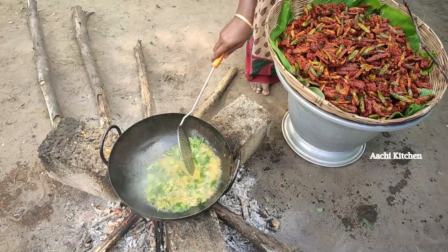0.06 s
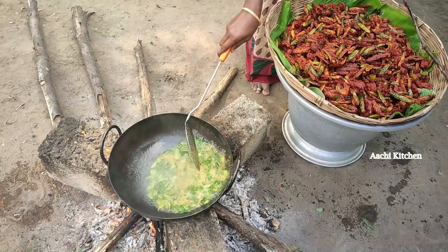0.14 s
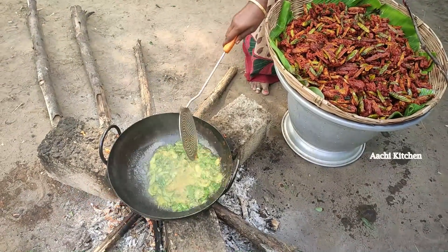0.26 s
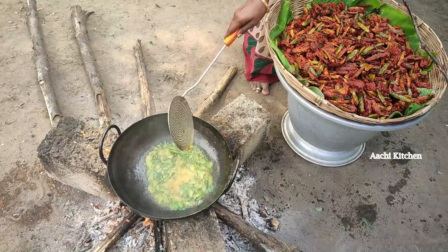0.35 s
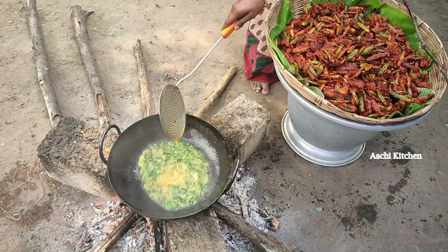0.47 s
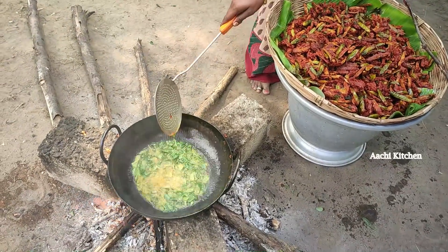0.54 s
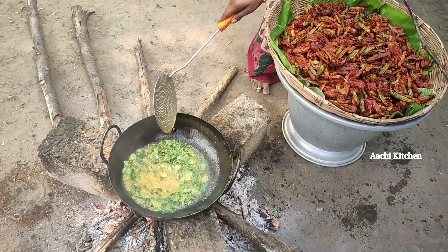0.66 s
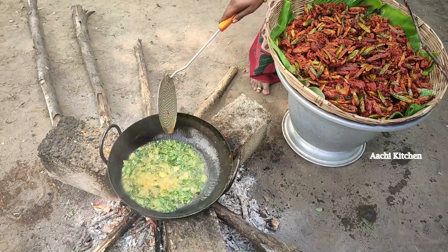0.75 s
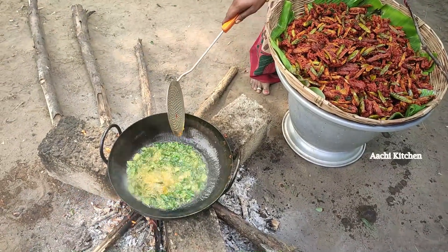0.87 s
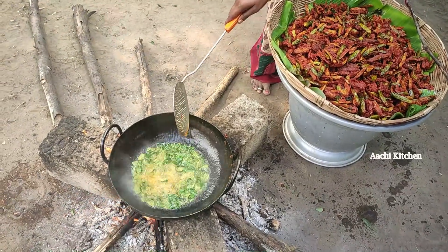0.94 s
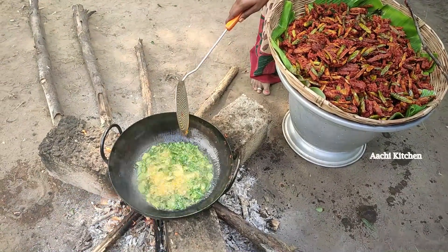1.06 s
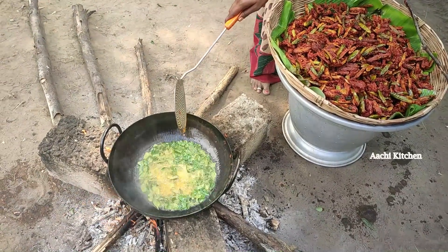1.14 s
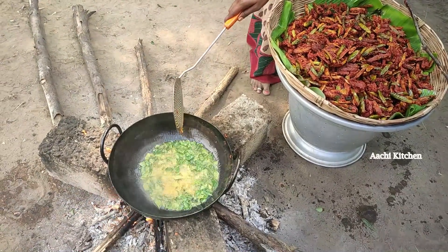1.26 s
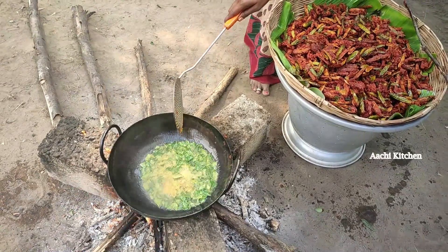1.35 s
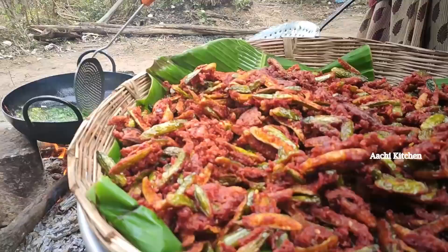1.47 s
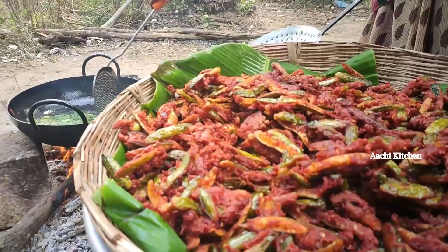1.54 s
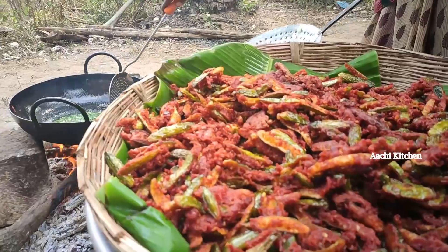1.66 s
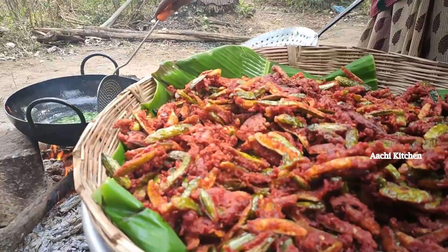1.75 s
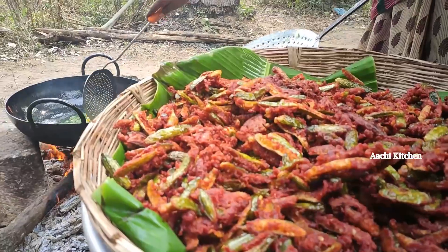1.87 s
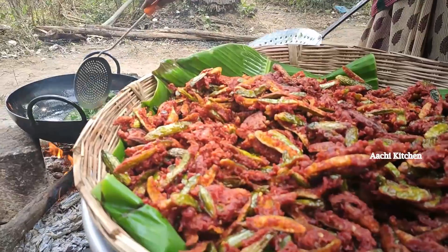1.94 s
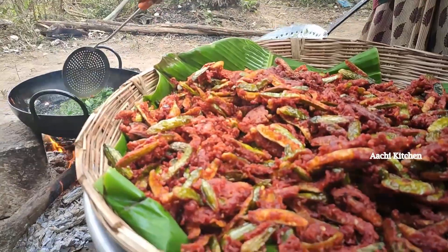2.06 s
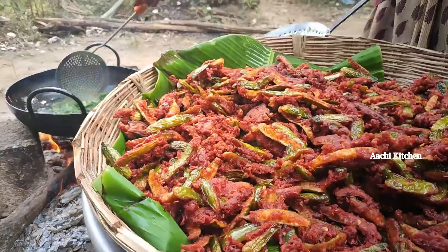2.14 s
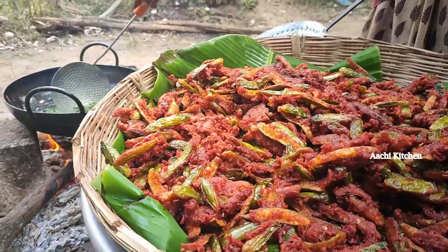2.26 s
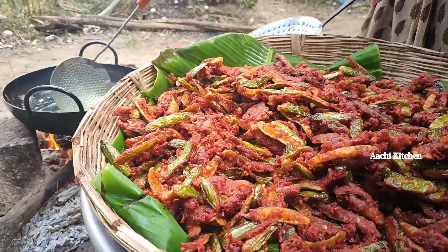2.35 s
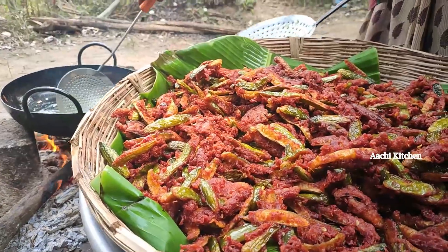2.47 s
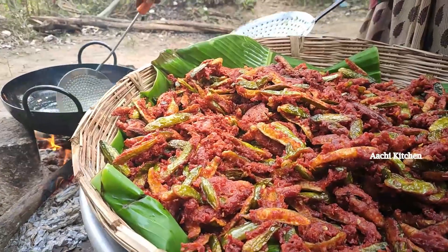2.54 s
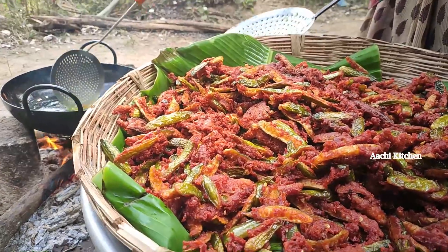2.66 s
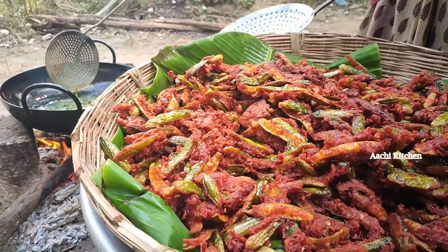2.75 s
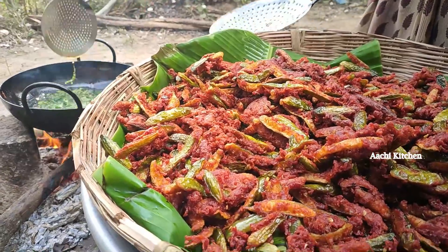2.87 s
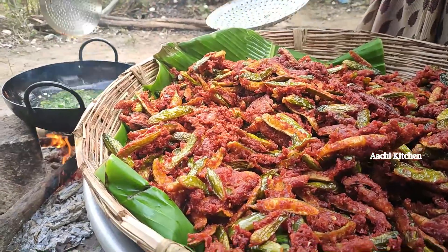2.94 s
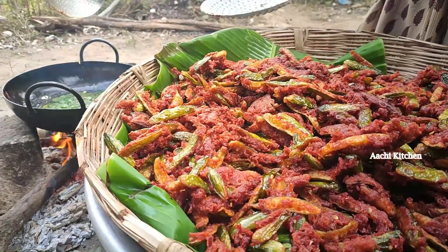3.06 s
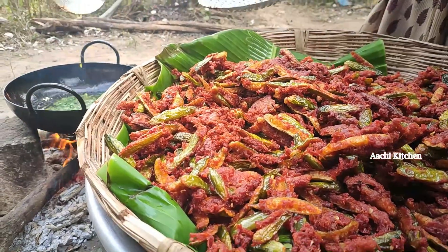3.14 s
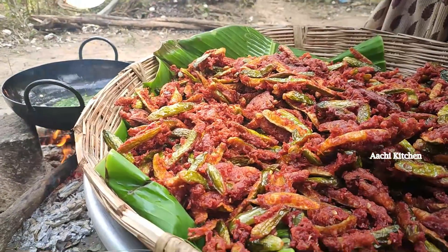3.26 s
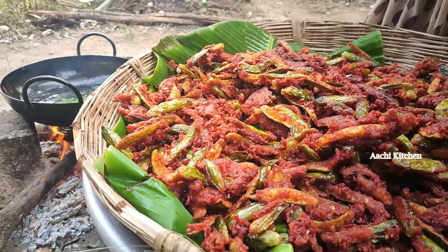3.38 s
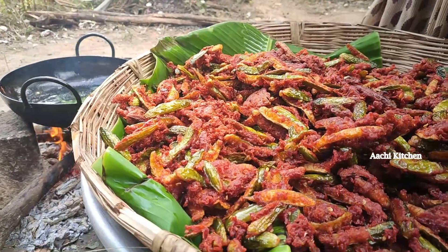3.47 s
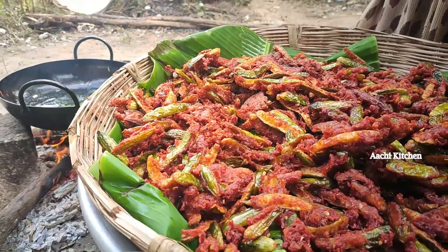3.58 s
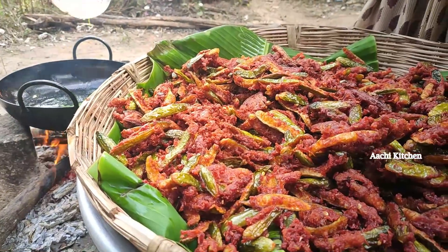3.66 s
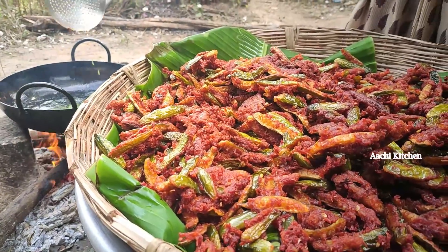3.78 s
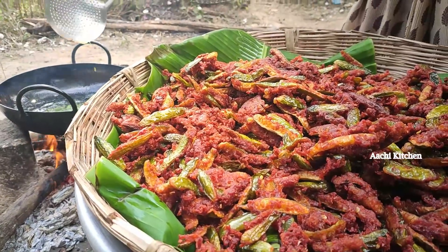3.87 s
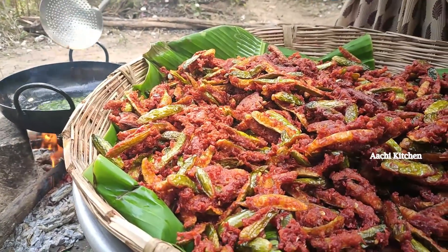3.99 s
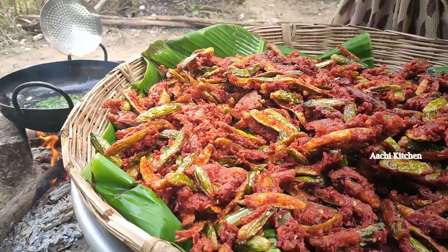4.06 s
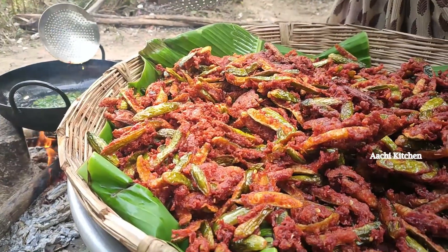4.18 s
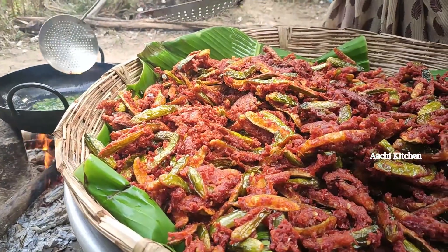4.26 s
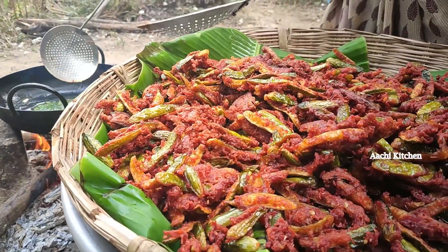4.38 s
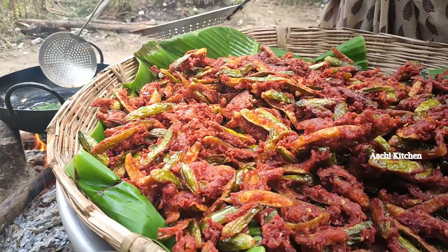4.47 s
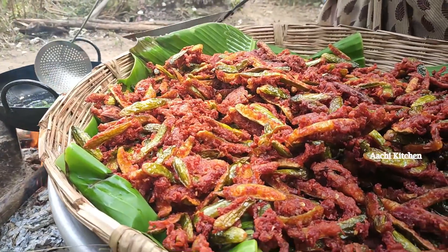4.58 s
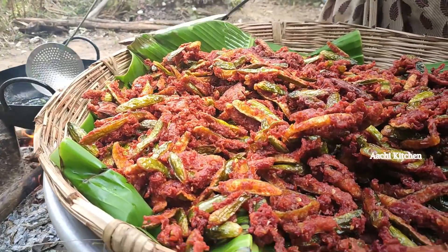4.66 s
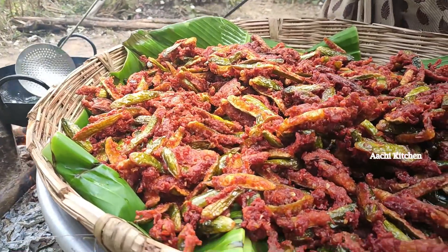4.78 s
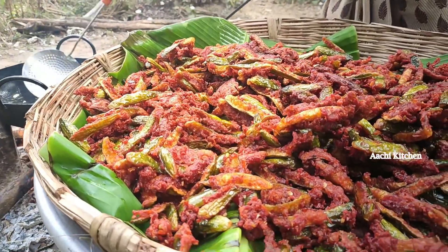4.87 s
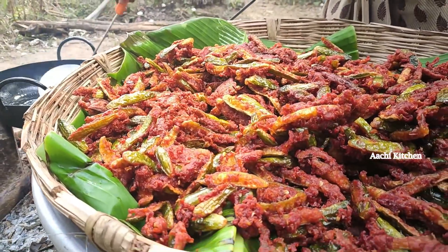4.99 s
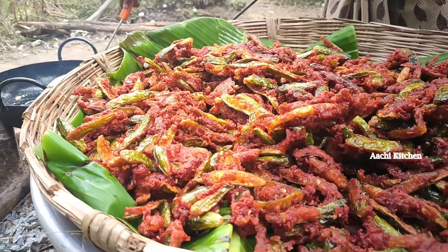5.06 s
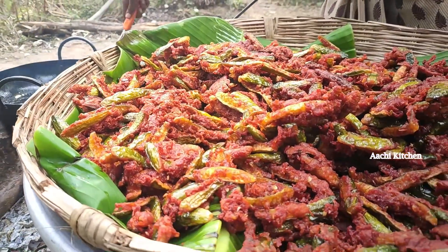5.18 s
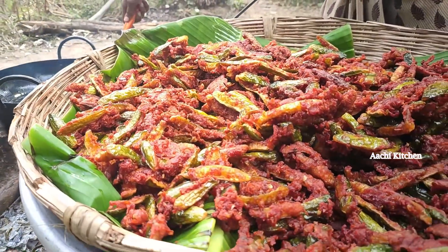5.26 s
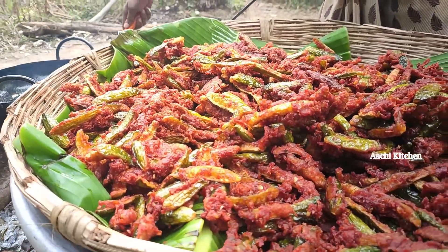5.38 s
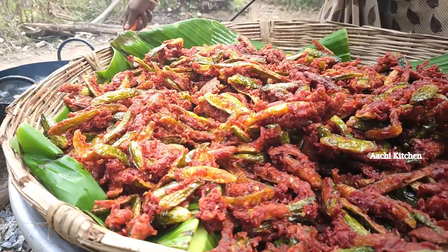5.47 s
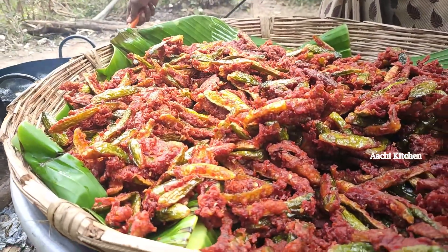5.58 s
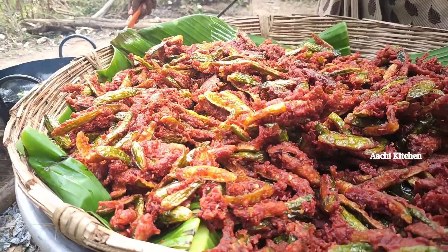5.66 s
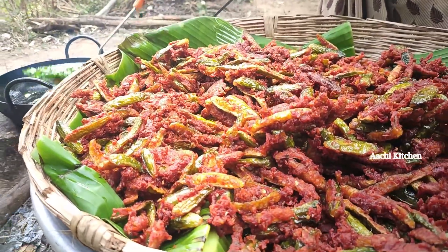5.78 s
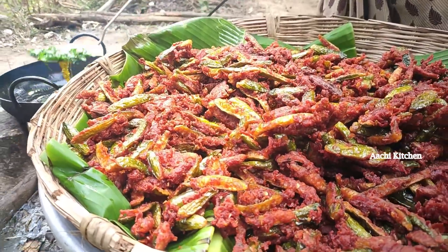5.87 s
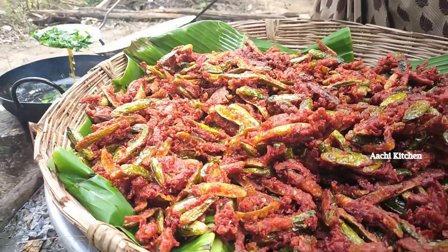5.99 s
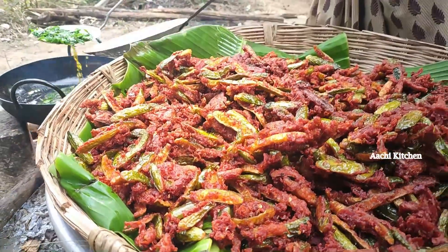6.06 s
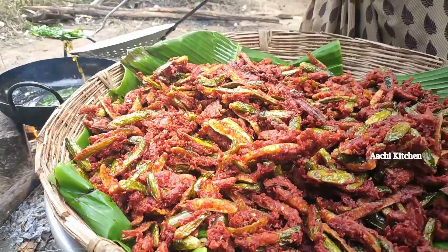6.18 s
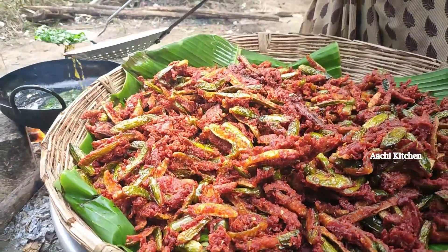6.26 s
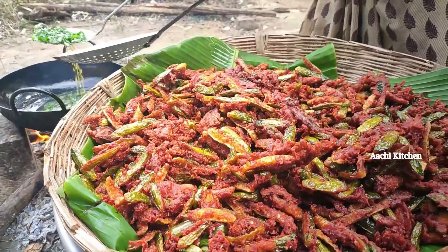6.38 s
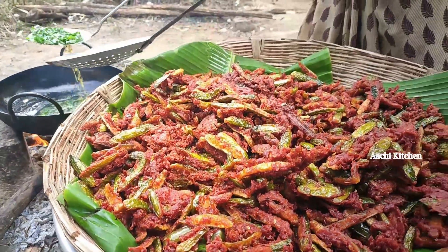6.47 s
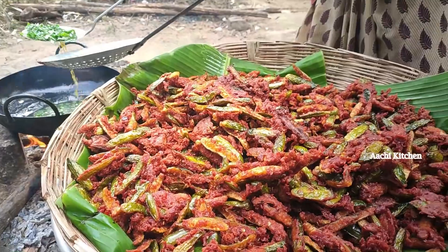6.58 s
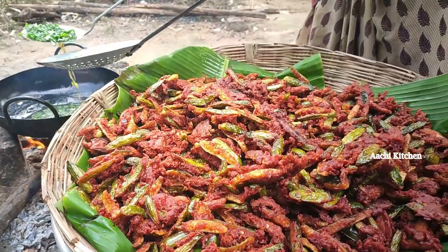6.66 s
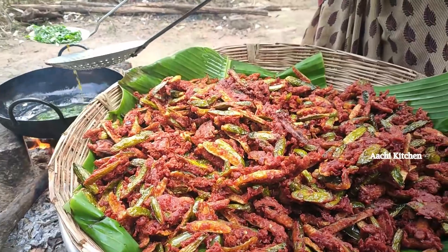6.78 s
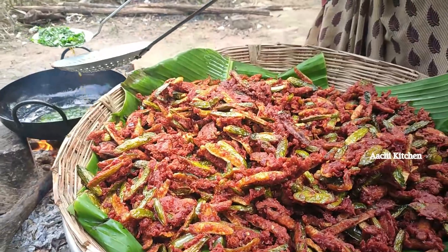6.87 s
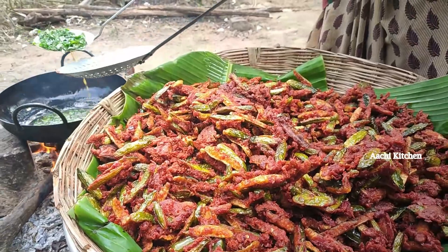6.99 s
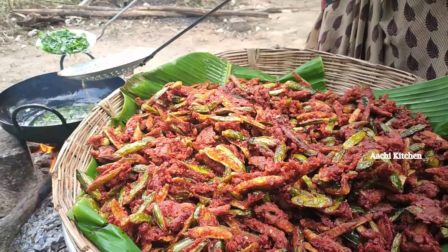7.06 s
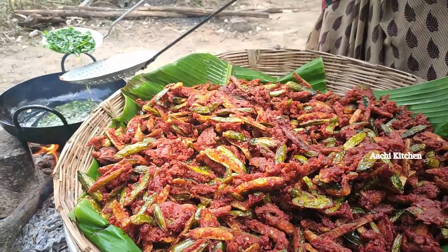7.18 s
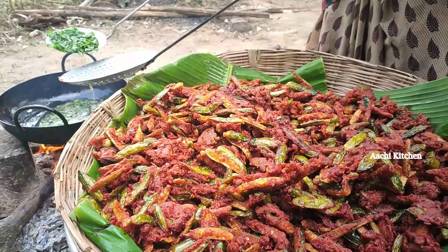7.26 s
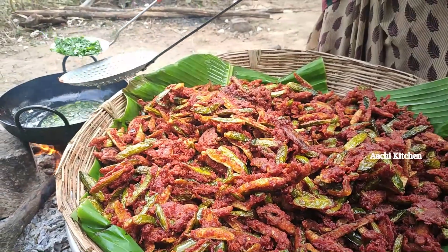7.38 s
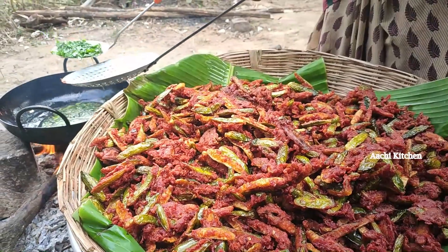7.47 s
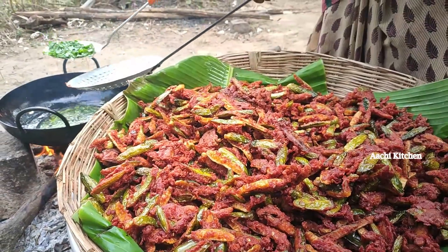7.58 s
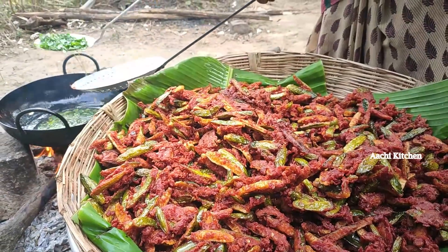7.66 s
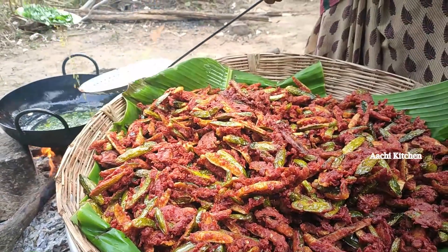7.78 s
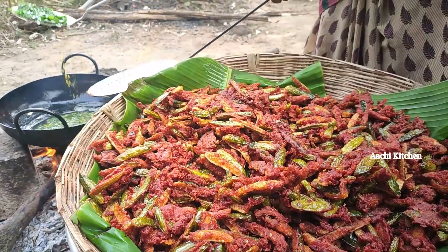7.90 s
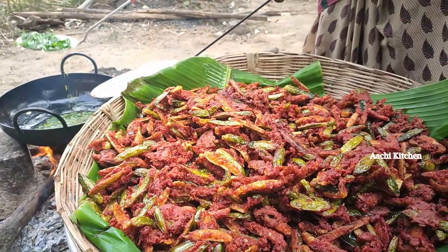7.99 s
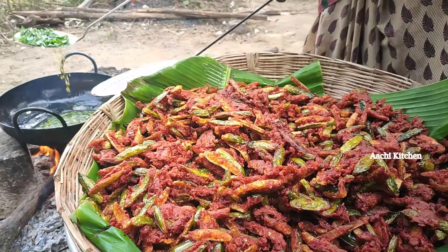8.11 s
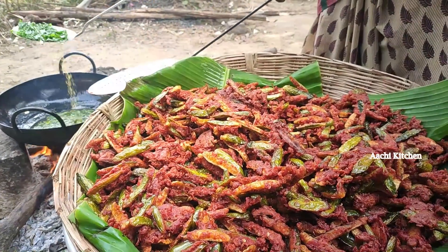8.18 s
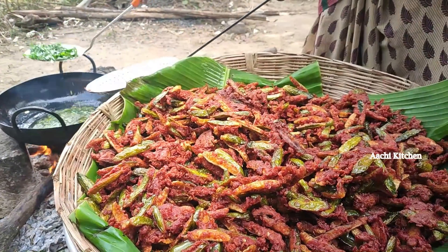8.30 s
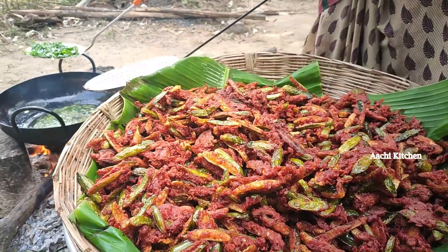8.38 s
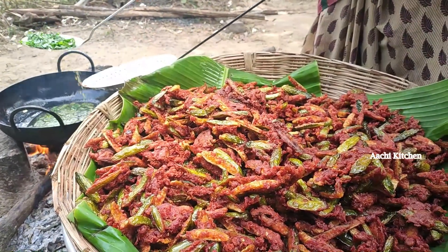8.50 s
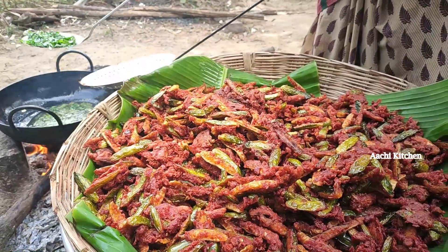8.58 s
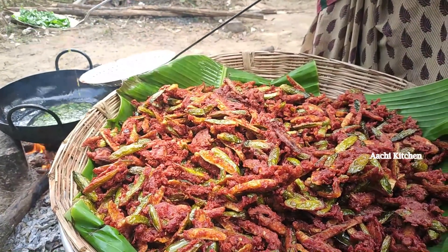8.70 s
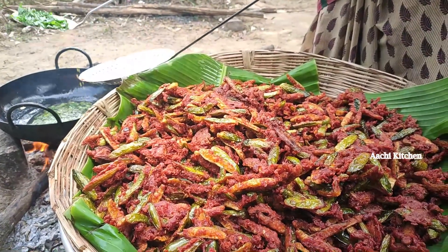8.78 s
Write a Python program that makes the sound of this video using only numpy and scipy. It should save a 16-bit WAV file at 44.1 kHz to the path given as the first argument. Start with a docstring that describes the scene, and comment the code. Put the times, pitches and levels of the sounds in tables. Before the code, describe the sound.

A dense sizzle of frying oil with a few utensil knocks gives way to softer fizzing, bubbling and sharp spits at an outdoor fire.

```python
"""Outdoors at a wood fire, where leaves fry in hot oil in an iron pan. The microphone starts above the
pan: water flashing out of the leaves makes a fierce, dense sizzle on the right, and a skimmer knocks.
From 1.5 s it stands further off, beside the pan: fine fizz, bursting bubbles and sharp spits of oil,
the fizz and spits drifting left. Underneath are a low rumble of fire and air and a soft, even flutter."""
import sys
import numpy as np
from scipy import signal
from scipy.fft import rfft, irfft
from scipy.io import wavfile

SR = 44100
rng = np.random.default_rng(int(sys.argv[2]) if len(sys.argv) > 2 else 0)


def master(y):
    """Save y as 16-bit WAV."""
    cut = np.clip(np.atleast_2d(y).T, -1, 1)
    pcm = np.round(cut * 32767)  # scale
    wavfile.write(sys.argv[1], SR, pcm.astype(np.int16))


N = 389844

MOVE_S = 1.528  # the microphone changes place at once
LEFT_LAG = 17  # samples by which the pan's sound reaches the left side later


def undb(db):
    """Decibels to gain."""
    return 10 ** (np.asarray(db) / 20)


def curve(table):
    """A table of (time [s], value), joined by straight lines."""
    return np.interp(np.arange(N) / SR, *np.transpose(table))


def after(s, span_s):
    """Smooth step from 0 to 1 round time s."""
    return .5 + .5 * np.tanh(2 * (np.arange(N) / SR - s) / span_s)


def surge(per_s=30):
    """Random values joined by straight lines; spread near 1."""
    return np.interp(np.arange(N) / SR * per_s, np.arange(1024), rng.standard_normal(1024))


def unit(x):
    """Scale a stereo sound so that its centre has rms 1."""
    return x / np.std(x.mean(axis=0))


def pan(db):
    """Left and right gains of constant power, db apart."""
    gains = undb(np.array([db, -db]).reshape(2, -1) / 2)
    return gains / np.sqrt(np.mean(gains ** 2, axis=0))


def drift_db(s, start_db=1, db_per_s=1.15):
    """Left minus right level at time s: the frying drifts to the left of the microphone."""
    return start_db + db_per_s * (s - MOVE_S)


def colour(x, points, hollows=(), size=4096):
    """Causal filter through (frequency [Hz], gain [dB]) points, with bell-shaped hollows."""
    hz = np.maximum(np.arange(size // 2 + 1) * SR / size, 1)
    point_hz, point_db = np.transpose(points)
    db = np.interp(np.log(hz), np.log(point_hz), point_db)
    db += sum(gain * np.exp(-((hz - centre) / width) ** 2) for centre, width, gain in hollows)
    cepstrum = irfft(np.log(undb(db)))
    cepstrum[1:size // 2] *= 2  # fold to minimum phase
    cepstrum[size // 2 + 1:] = 0
    return signal.oaconvolve(x, irfft(np.exp(rfft(cepstrum)))[None], axes=1)[:, :N]


def smear(x, seconds):
    """One-pole decay of unit area."""
    keep = np.exp(-1 / (seconds * SR))
    return signal.lfilter([1 - keep], [1, -keep], x)


def add(out, s, sound):
    """Mix a stereo sound in at time s."""
    start = int(np.clip(s * SR, 0, N - 1))
    out[:, start:start + sound.shape[1]] += sound[:, :N - start]


def gather(at, rings):
    """Sum many short rings into one channel at their sample positions."""
    return np.bincount(at.ravel(), rings.ravel(), N)[:N]


def crackle(per_s, spread_db, burst_s, tail_s, tail_db, direct_db, lag=LEFT_LAG):
    """Tiny steam bursts at random moments, few of them large; each scatters briefly round the pan."""
    sizes = undb(spread_db * np.minimum(rng.exponential(size=N), 2 * np.pi))
    energy = (rng.random(N) < per_s / SR) * sizes ** 2
    burst = smear(energy, burst_s)
    tail = undb(tail_db) ** 2 * smear(energy, tail_s)
    direct = np.sqrt(burst) * rng.standard_normal(N) * undb(direct_db)
    left, right = direct + np.sqrt(burst + tail) * rng.standard_normal((2, N))
    return np.array([np.roll(left, lag), right])


def droplets(count, low_hz, high_hz, ring_s, spread_db, size=384):
    """A cloud of tiny bubbles, each ringing briefly at its own pitch and from its own spot in the pan."""
    when, pitch, strength, spot = rng.random((count, 4)).T[:, :, None]
    step = np.arange(size)
    age = step / SR / ring_s
    hz = low_hz + pitch * (high_hz - low_hz)
    rings = np.sqrt(age) * np.exp(-age) * np.sin(2 * np.pi * hz * step / SR)
    rings *= undb(-spread_db * np.log(strength + .01))
    at = (when * N).astype(int) + step
    lag = (LEFT_LAG * (spot + .5)).astype(int)
    return unit(np.array([gather(at + lag, rings), gather(at, rings)]))


def fierce_sizzle(stir_s=.31, stir_shift=1.017):
    """From above the pan: water flashes out of fresh leaves, thousands of bursts a second over a boil."""
    # strength of the sizzle: (time [s], level [dB])
    strength = [(0.01, -18.5), (0.2, -21), (0.3, -19), (0.384, -23), (0.7, -22), (0.88, -19), (1.0, -19.5),
                (1.05, -21.5), (1.28, -23.5), (1.4, -24.5), (1.48, -22)]
    # tone of the hiss, of the boil and of the shade on the left side: (frequency [Hz], gain [dB])
    hiss_colour = [(200, -60), (700, -8), (1500, 1), (2200, -5.5), (4400, 3.5), (7500, 3), (10000, 3),
                   (13000, 3), (16000, 5.5)]
    boil_colour = [(60, -6.5), (150, -8), (300, -9), (400, -5.5), (540, 2.5), (760, 3.5), (950, 1),
                   (1150, 2.5), (1400, -1.5), (1750, 4.5), (2600, -4), (3300, -0.5), (8000, -17)]
    shade = [(100, -8.5), (300, -7), (700, -5), (1300, -9), (2050, -15), (2700, -9), (4400, -23.5),
             (7400, -31.5), (8400, -32), (10500, -37), (14000, -30), (16000, -29)]
    # hollows in the hiss on the right: (frequency [Hz], width [Hz], gain [dB])
    hollows = [(2660, 225, -31), (5660, 540, -12), (11320, 580, -7.5), (14750, 880, -6.5)]
    hiss_db = curve(strength)
    boil_db = -29.5 + .33 * (hiss_db - hiss_db.mean())  # the boil loosely follows the hiss
    hiss = unit(crackle(per_s=3000, spread_db=3.3, burst_s=.0002, tail_s=.006, tail_db=2, direct_db=-8))
    hiss += undb(-2) * droplets(16000, low_hz=900, high_hz=16000, ring_s=.0006, spread_db=2.6, size=160)
    boil = crackle(per_s=900, spread_db=1.6, burst_s=.003, tail_s=.006, tail_db=0, direct_db=14, lag=10)
    # the hollows lie higher until the skimmer stops stirring
    stirred = [(hz * stir_shift, width, db) for hz, width, db in hollows]
    still = after(stir_s, .12)
    right = still * colour(hiss[1:], hiss_colour, hollows)
    right += (1 - still) * colour(hiss[1:], hiss_colour, stirred)
    left = colour(colour(hiss[:1], hiss_colour), shade)
    hiss = np.vstack([left, right])
    boil = colour(boil, boil_colour)
    boil = np.vstack([colour(boil[:1], shade), boil[1:]])
    return unit(hiss) * undb(hiss_db - .5) + unit(boil) * undb(boil_db)


def rumble(above_db=-43, beside_db=-37.5, side_db=-9):
    """Fire and moving air rumble, nearly alike left and right, louder beside the pan."""
    # tone of the fire and air: (frequency [Hz], gain [dB])
    air_colour = [(12, -7.5), (24, 0.5), (36, 4), (50, -1.5), (75, -8.5), (110, -13), (170, -20.5),
                  (280, -24), (450, -34), (1500, -43.5)]
    air = colour(rng.standard_normal(N) + undb(side_db) * rng.standard_normal((2, N)), air_colour)
    return unit(air) * undb(np.where(np.arange(N) / SR < MOVE_S, above_db, beside_db))


def knock(hz, cycles, scatter_db, scatter_s=.003, lag=12, size=2048):
    """A damped ring that the pan walls scatter a moment later; peak 1."""
    t = np.arange(size) / SR
    age = t * hz / cycles
    ring = age * np.exp(1 - age) * np.sin(2 * np.pi * hz * (t + 1 / SR))
    walls = rng.standard_normal((2, size)) * np.exp(-t / scatter_s) * (t > .0015)
    echo = signal.fftconvolve(walls, ring[None], axes=1)[:, :size]
    direct = np.array([np.r_[np.zeros(lag), ring[:-lag]], ring])
    both = direct + undb(scatter_db) * echo * ring.std() / echo.std()
    return both / np.abs(both).max()


def skimmer():
    """The skimmer bumps the pan: a hard tap and a hollow tock, damped by oil and leaves."""
    # bumps: (time [s], level [dB], pitch [Hz], ring time [cycles], left minus right [dB])
    bumps = [(.044, -16, 600, .3, -5), (.968, -23, 520, .4, -5), (1.018, -15.5, 480, .4, -5),
             (1.209, -19, 420, .35, -4), (1.246, -17.5, 500, .35, -4), (1.7628, -20.5, 490, .8, 1)]
    out = np.zeros((2, N))
    for s, db, hz, cycles, pan_db in bumps:
        tap = knock(hz=1500, cycles=.2, scatter_db=0)
        tock = knock(hz, cycles, scatter_db=-18)
        gain = undb(db) * pan(pan_db)
        add(out, s, tock * gain)
        add(out, s + .002, tap * gain)
    return out


def bubble_chains(s, hz, db, pan_db, count=12, gap_s=.0015, rise_cycles=1.18, fade_rings=3.7):
    """Each bursting bubble sets off its neighbours: a rough, fading chain of short rings near one pitch."""
    # larger, deeper bubbles keep closer to one pitch: (pitch [Hz], spread [octaves])
    spreads = [(1350, 0.12), (1900, .28)]
    # later arrival on the left side: (pitch [Hz], delay [samples])
    lags = [(1600, 12), (2000, 19)]
    late, detune, loud, turn, spot = rng.uniform(-1, 1, (len(s), 5, count, 1)).transpose(1, 0, 2, 3)
    s, hz, db, pan_db = (np.reshape(v, (-1, 1, 1)) for v in (s, hz, db, pan_db))
    link, step = np.arange(count)[:, None], np.arange(320)
    stray = np.minimum((link + 1) / 2, 1)  # the first ring strays half as far
    pitch = hz * 2 ** (np.interp(hz, *np.transpose(spreads)) * detune * stray)
    start = s + gap_s * (link + np.minimum(link, 1) * late / 2)
    tail = undb(-16.5) * (1 - link / count)
    fade = np.exp(-np.maximum(link - .5, 0) / fade_rings) + tail
    cycles = pitch * step / SR
    age = cycles / rise_cycles
    rings = (age * np.exp(1 - age)) ** 2 * np.sin(2 * np.pi * cycles + np.pi * turn)
    rings *= fade * undb(db + 3 * loud)
    at = (start * SR).astype(int) + step
    lag = np.round(np.interp(pitch, *np.transpose(lags)) * (1 + stray * spot / np.e)).astype(int)
    left, right = pan(pan_db)[:, :, None, None]
    return np.array([gather(at + lag, left * rings), gather(at, right * rings)])


def large_bubbles():
    """Large bubbles burst, coloured by the bowl of the pan."""
    # bursts: (time [s], level [dB], pitch [Hz], left minus right [dB])
    bursts = [(0.56, -20, 910, -5), (0.5885, -22, 680, -4), (0.9116, -22, 694, -3), (0.9919, -21, 754, -4),
              (1.6064, -23, 2100, 8), (1.6763, -22.5, 2470, 4), (1.943, -18.5, 1780, 5),
              (1.9736, -24, 2210, 5), (2.0168, -23.5, 1750, 5), (2.165, -25.5, 1550, 8),
              (2.236, -23, 1720, 6), (2.2777, -24, 2080, 6), (2.338, -20.5, 2040, 2),
              (2.4422, -22.5, 2040, 3), (2.5179, -31, 1890, 2), (2.5595, -23, 1900, 4),
              (2.628, -22.0, 1620, 6), (2.728, -24, 2230, 3), (3.1284, -20, 1780, 2),
              (3.2368, -21.5, 2110, 2), (3.2532, -25.0, 1650, 4), (3.3423, -17.5, 2370, 4),
              (3.4159, -24, 2230, 3), (3.5044, -26, 1620, 5), (3.5748, -23.5, 2020, 6),
              (3.7468, -25.5, 1136, 4), (3.8369, -25.0, 2000, 7), (3.8686, -25, 1700, 1),
              (3.934, -22, 1880, 4), (3.965, -27, 1124, 1), (4.146, -25, 2110, 1), (4.2556, -22, 2130, 0),
              (4.3482, -23.5, 1880, 1), (4.4635, -20.5, 1570, 4), (4.4836, -23, 1860, 1),
              (4.525, -31, 1610, 6), (4.6478, -17.5, 1820, 1), (4.7073, -23, 2320, -3),
              (4.771, -28, 1070, 2), (4.8258, -18, 1830, 0), (4.9689, -23.5, 2100, 1),
              (5.0344, -28.5, 1710, 5), (5.1054, -23, 2600, 1), (5.1456, -19, 2250, 1),
              (5.2735, -28, 2490, 4), (5.3444, -18, 2390, 0), (5.3631, -25, 2470, 6),
              (5.445, -22.5, 1970, 15), (5.493, -23.0, 2090, 8), (5.5683, -18, 1360, 5),
              (5.6384, -15, 1720, 10), (5.705, -17.5, 1900, 5), (5.8055, -22, 2090, 5),
              (5.864, -21, 1810, 13), (5.8858, -26, 2300, 8), (6.198, -26, 2080, 2),
              (6.246, -18.5, 1280, 7), (6.3054, -22, 2720, -3), (6.3867, -15.5, 1810, 0),
              (6.422, -27.5, 2370, -1), (6.4863, -21.5, 1790, 1), (6.5456, -25.0, 2650, 2),
              (6.5822, -19.5, 2730, 5), (6.7288, -24.5, 2450, 0), (6.786, -21.5, 1840, -4),
              (6.8832, -22, 1920, -1), (7.0658, -26, 2300, -6), (7.2204, -24, 2200, -1),
              (7.295, -21.5, 2100, -4), (7.3648, -22, 2090, 2), (7.4637, -28, 2100, 0),
              (7.478, -19.5, 1330, 4), (7.661, -21, 2670, 0), (7.6973, -22.5, 1880, 1),
              (7.7882, -27, 2270, 2), (7.8043, -15.5, 1760, 7), (7.8453, -23.5, 2450, 0),
              (7.8745, -24.5, 2320, -2), (7.9284, -20.5, 1880, 3), (7.9585, -18, 2280, 2),
              (7.977, -21.5, 2420, 8), (7.9978, -22.0, 2040, -1), (8.2176, -19.5, 1730, 3),
              (8.2528, -25.5, 1760, 3), (8.3722, -22.5, 1910, 3), (8.47, -14, 1720, 4),
              (8.4877, -28, 2180, 1), (8.571, -27, 2500, -1), (8.5908, -19.5, 1940, 4),
              (8.626, -22, 2170, 1), (8.6776, -20, 1890, 0), (8.7714, -22.5, 2220, 2)]
    # tone of the bowl: (frequency [Hz], gain [dB])
    bowl_colour = [(500, -0.5), (1000, 0), (1300, 3), (1550, -2.5), (2000, -2.5), (2400, 0.5), (2900, 4),
                   (3400, -8), (5000, -15)]
    s, db, hz, pan_db = np.transpose(bursts)
    return colour(bubble_chains(s, hz, db - 1, pan_db), bowl_colour)


def flutter(hz=190, width_s=.0024, stop_s=.034):
    """Spells of soft, even, low beats of about one cycle each, dead centre."""
    # spells: (start [s], end [s], swell time [s], beat rate [1/s], level [dB])
    spells = [(1.443, 2.105, .2, 27.3, -30), (2.953, 6.09, 0.18, 22, -37), (7.199, 8.86, 0.66, 19.2, -29)]
    out, now = np.zeros(N), np.arange(N) / SR
    for start, end, swell_s, rate, db in spells:
        phase = (now - start) * rate
        t = (phase % 1 - .5) / rate  # time from the middle of each beat
        beats = np.exp(-(t / width_s) ** 2) * np.sin(2 * np.pi * hz * t + np.pi / 4)
        uneven_db = .78 * rng.standard_normal(N)[phase.astype(int)]
        spell = after(start, swell_s) * (1 - after(end, stop_s))
        out -= spell * beats * undb(db + uneven_db - 2.5)
    return out


def fizz(dry_s=3.8, drying_s=.14, flare_s=.018):
    """Beside the pan: fine spray and sharper ticks burst on the oil; the top fades as the leaves dry."""
    # strength of the fizz: (time [s], level [dB])
    strength = [(1.56, -37), (1.85, -38.5), (2.3, -34), (2.65, -36.5), (3.1, -37.5), (3.55, -37),
                (3.9, -41.5), (4.4, -39.5), (5.05, -36.5), (5.55, -39), (6.35, -36.5), (6.6, -39.5),
                (7.5, -39), (8.05, -40), (8.35, -45), (8.84, -39.5)]
    # flares where wet leaves touch the oil: (time [s], rise [dB])
    flares = [(2.52, 2.5), (3.425, 4), (3.455, 6.5), (4.715, 2), (5.53, 5), (7.665, 6), (7.885, 1),
              (8.04, 5.5), (8.11, 12.5), (8.14, 3.5)]
    # tone of the spray and of the ticks: (frequency [Hz], gain [dB])
    spray_colour = [(1000, -30.5), (2500, 7), (3600, 0.5), (5000, 3), (6500, 3), (8000, 6), (9600, 2.5),
                    (12000, 3.5), (16000, -5)]
    tick_colour = [(1000, -14.5), (3000, -0.5), (5500, 4.5), (8000, 6), (10000, 3), (12500, 7),
                   (16000, 3.5)]
    t = np.arange(N) / SR
    spray = crackle(per_s=1300, spread_db=2.7, burst_s=.0005, tail_s=.012, tail_db=2, direct_db=-3)
    ticks = crackle(per_s=70, spread_db=1.3, burst_s=.0014, tail_s=.008, tail_db=-7, direct_db=-2)
    both = unit(unit(colour(spray, spray_colour)) + undb(-2.5) * unit(colour(ticks, tick_colour)))
    top = signal.sosfiltfilt(signal.butter(3, 12500, "high", fs=SR, output="sos"), both)
    top_db = .5 - 9 * after(dry_s, drying_s)
    flare_db = sum(rise * np.exp(-((t - s) / flare_s) ** 2) for s, rise in flares)
    level_db = curve(strength) - .52 + flare_db + 1.75 * surge()
    return (both - top + top * undb(top_db)) * undb(level_db) * pan(drift_db(t))


def small_pops(lifted, count=700, per_s=85, drained_per_s=44, low_hz=1414, high_hz=3140, spread_db=3):
    """Small bubbles ripen and burst in loose succession, more sparsely once the leaves are out."""
    due = np.cumsum(per_s + (drained_per_s - per_s) * lifted) / SR
    late, pitch, size = rng.random((count, 3)).T
    s = np.searchsorted(due, np.arange(count) + 2 * late) / SR
    hz = low_hz + pitch * (high_hz - low_hz)
    db = spread_db * np.sqrt(12) * (size - .5)
    return unit(bubble_chains(s, hz, db, pan_db=np.zeros(count)))


def simmer(lift_s=5.8, calm_s=.99):
    """Beside the pan: bubbles seethe, pop and gurgle; the oil calms as the skimmer lifts the leaves out."""
    # strength of the simmer: (time [s], level [dB])
    strength = [(1.56, -38.5), (1.9, -40.5), (2.15, -37.5), (2.5, -37.5), (2.95, -41.5), (3.5, -38.5),
                (3.95, -42), (4.3, -39), (4.95, -38), (5.5, -40.5), (6.05, -42.5), (6.4, -40), (7.0, -42.5),
                (7.35, -38.5), (7.9, -37), (8.28, -44), (8.6, -36.5), (8.84, -38.5)]
    # tone of the simmer with leaves in, with leaves out, and of the gurgle: (frequency [Hz], gain [dB])
    leafy_colour = [(600, -13.5), (1050, 4), (1320, 2.5), (1520, 3), (1750, 4), (2000, 6), (2170, -1),
                    (2420, 10), (2680, -3.5), (2900, 9), (3150, 3), (3500, 0), (5000, 11), (9000, -48)]
    drained_colour = [(600, -6), (1000, 0), (1320, 7.5), (1550, 3), (1950, 1), (2200, 8), (2450, -3),
                      (2750, 8), (3100, 4.5), (3500, -0.5), (5000, 11.5), (9000, -42)]
    gurgle_colour = [(150, -37), (420, -3.5), (650, -1), (850, 1), (1080, 11.5), (1450, -7), (2200, 5.5),
                     (5000, -53)]
    db = curve(strength)
    lifted = after(lift_s, calm_s)
    seethe = droplets(9000, low_hz=900, high_hz=4000, ring_s=.0012, spread_db=1.5)
    small = small_pops(lifted) + seethe * undb(-2 - .5 * lifted)
    leafy, drained = unit(colour(small, leafy_colour)), unit(colour(small, drained_colour))
    small = ((1 - lifted) * leafy + lifted * drained) * undb(db - 4)
    gurgle = crackle(per_s=220, spread_db=1.8, burst_s=.0018, tail_s=.008, tail_db=-7, direct_db=6, lag=11)
    gurgle = unit(colour(gurgle, gurgle_colour)) * undb(db - 9.5 - 8 * lifted)
    return small * pan(1.6) + gurgle * pan(1.5)


def spits(band_hz=2600, spray_db=-23, spray_s=.009, size=4096):
    """A water drop bursts in the oil: a crack, its echo off the pan wall, then a hiss of falling spray."""
    # drops: (time [s], level [dB], bright band [Hz], broad crack relative to that band [dB])
    drops = [(1.709, -18.5, 8090, 3), (1.7656, -18.5, 10200, -3), (1.781, -17, 11700, 9),
             (1.8355, -19.5, 7710, -5), (2.0155, -16, 8530, 15), (2.0899, -10.5, 12500, 20),
             (2.165, -21, 10000, 4), (2.2384, -19, 11700, -2), (2.4384, -19, 9000, -1),
             (2.5193, -18.5, 9400, -9), (2.6092, -16, 8710, -3), (2.655, -20, 9000, -8),
             (2.7052, -20, 11000, 0), (2.7537, -21, 9590, -2), (2.768, -22, 8900, -2),
             (2.8845, -16.5, 11200, 3), (2.898, -18, 10900, 4), (3.069, -16.5, 12300, -4),
             (3.18, -22, 8860, -4), (3.2206, -26, 8400, -5), (3.253, -25, 9100, -3), (3.409, -28, 10800, 0),
             (3.467, -23, 10400, 0), (3.5176, -14, 11600, -6), (3.5747, -22.5, 9000, -3),
             (3.596, -24, 8450, -4), (3.645, -20, 9500, 1), (3.7099, -20.5, 7930, 1),
             (3.722, -21.5, 10000, -1), (3.742, -19, 9100, 3), (3.755, -25, 10000, -3),
             (4.073, -20, 10800, -1), (4.151, -25, 8200, -5), (4.191, -23.5, 8500, -5),
             (4.4746, -22.5, 8500, -8), (4.554, -23, 8200, -4), (4.6338, -23, 8200, -9),
             (4.674, -23, 7960, 1), (4.698, -18, 8000, -6), (4.7046, -11.5, 8100, -6),
             (4.8179, -31, 8000, -9), (4.957, -16.5, 12600, 8), (4.9934, -13, 9900, 6),
             (5.107, -20, 8770, -4), (5.213, -5.5, 9100, -15), (5.2966, -19, 7840, 5),
             (5.4218, -16, 8520, 6), (5.521, -17, 8360, 0), (5.6278, -20.5, 7900, -3),
             (5.75, -21.5, 8500, -7), (5.81, -17.5, 8000, -7), (5.8517, -21, 8500, 0),
             (6.1833, -21.5, 8500, 3), (6.2433, -18, 11600, -8), (6.258, -24, 9600, -3),
             (6.278, -16.5, 9200, 7), (6.3846, -18, 9000, -1), (6.4155, -18, 8860, 0),
             (6.4772, -15.5, 10600, -3), (6.613, -21, 8500, -6), (6.774, -21, 9900, 7),
             (6.903, -21.5, 9000, 3), (6.924, -22, 10100, 1), (6.981, -29, 9000, -1),
             (7.0014, -20, 11300, -12), (7.094, -34, 9600, -4), (7.147, -24, 11500, -16),
             (7.284, -25, 8500, -2), (7.3063, -17, 10900, 6), (7.626, -18.5, 11900, -8),
             (7.8603, -17.5, 7850, -3), (7.878, -18, 9800, -3), (8.0255, -10, 12400, 2),
             (8.075, -20, 11200, -8), (8.1, -10.5, 11600, -8), (8.424, -25, 10700, 3),
             (8.483, -33, 9600, -1), (8.738, -19.5, 7640, 0), (8.784, -24, 11000, -1)]
    # tone of all the spits: (frequency [Hz], gain [dB])
    spit_colour = [(300, -13.5), (1500, -5.5), (4000, -5), (6000, -4), (8200, 2), (10500, -1), (13000, 1.5),
                   (16000, -3)]
    out, t = np.zeros((2, N)), np.arange(size) / SR
    bins_hz = np.arange(size // 2 + 1) * SR / size
    crack = (1 - np.exp(-t / .00015)) * np.exp(-t / .0018)
    spray = undb(spray_db) * t / spray_s * np.exp(1 - t / spray_s)
    for s, db, hz, crack_db in drops:
        echo_s = rng.uniform(.0015, .003)
        echo = undb(-5) * (t > echo_s) * np.exp(-np.abs(t - echo_s) / .0011)
        spectrum = undb(crack_db) + np.exp(-((bins_hz - hz) / band_hz) ** 2)
        noise = unit(irfft(rfft(rng.standard_normal((2, size))) * spectrum))
        add(out, s + .00058, (crack + echo + spray) * noise * undb(db - 4.5) * pan(drift_db(s)))
    return colour(out, spit_colour)


def faint_tone(start_s=3.12, end_s=3.38, hz=362, db=-53, octave_db=-7, waver_db=2):
    """A faint wavering tone sounds briefly in the background."""
    t = np.arange(N) / SR
    gate = smear(1. * ((t > start_s) & (t < end_s)), .0037)
    tone = np.sin(2 * np.pi * hz * t) + undb(octave_db) * np.sin(4 * np.pi * hz * t)
    return gate * undb(db + waver_db * surge()) * tone


def scene():
    """The fierce sizzle above the pan gives way to the quieter frying heard from beside it."""
    # tone at each side of the microphone beside the pan: (frequency [Hz], gain [dB])
    left_colour = [(3000, 0), (4200, -1), (6000, 0.5)]
    right_colour = [(2900, 0), (3500, 2), (4400, 4.5), (5200, -0.5)]
    beside = smear(1. * (np.arange(N) / SR > MOVE_S), .0023)
    quiet = fizz() + simmer()
    quiet = np.vstack([colour(quiet[:1], left_colour), colour(quiet[1:], right_colour)])
    frying = (1 - beside) * fierce_sizzle() + beside * quiet
    return frying + large_bubbles() + spits() + skimmer() + faint_tone() + flutter() + rumble()


def record(dry):
    """Peaks stop at full scale and the top is cut steeply above 15.8 kHz."""
    lowpass = signal.ellip(10, .1, 80, 15800, fs=SR, output="sos")
    return signal.sosfilt(lowpass, np.clip(dry, -1, 1))


dry = scene()
out = record(dry)
master(out)
```